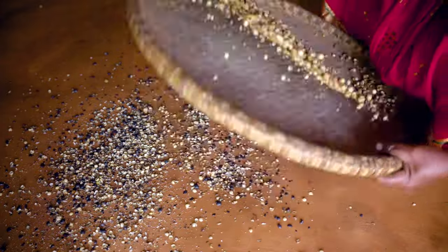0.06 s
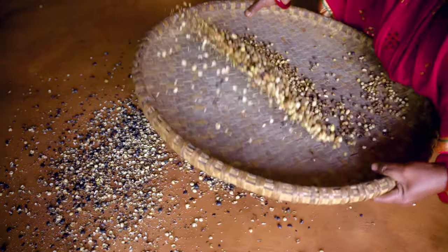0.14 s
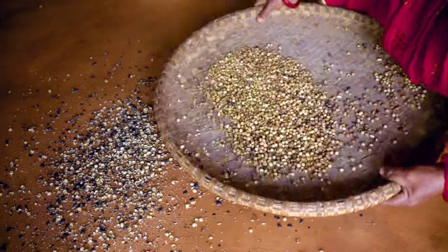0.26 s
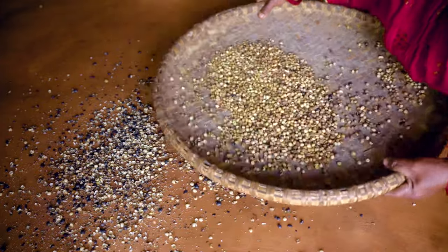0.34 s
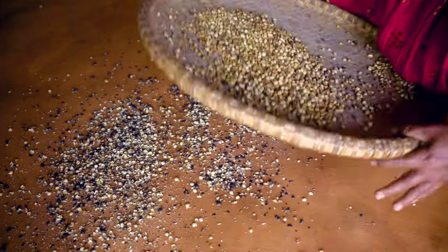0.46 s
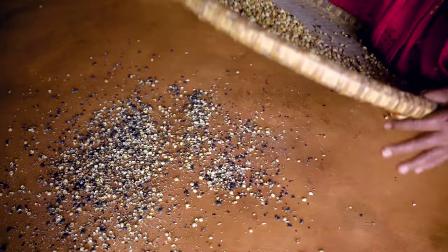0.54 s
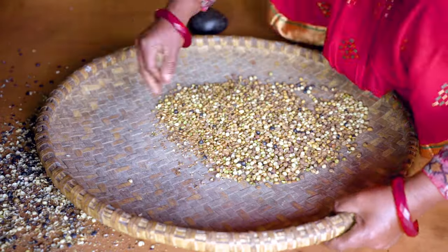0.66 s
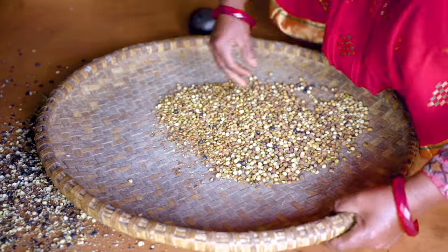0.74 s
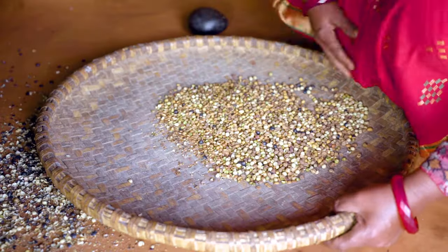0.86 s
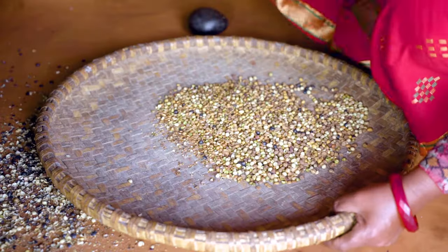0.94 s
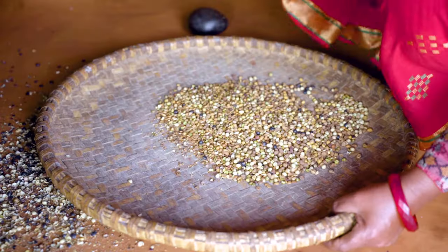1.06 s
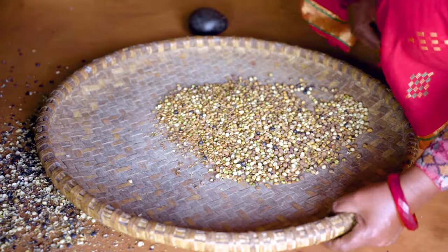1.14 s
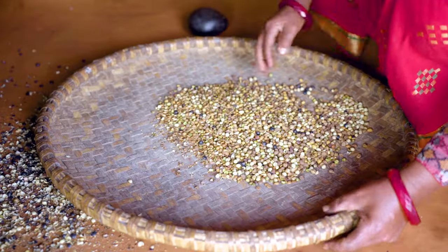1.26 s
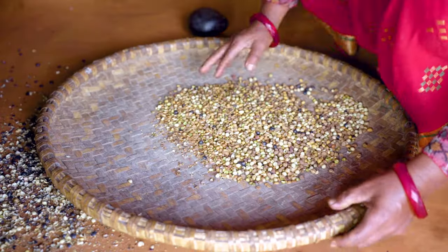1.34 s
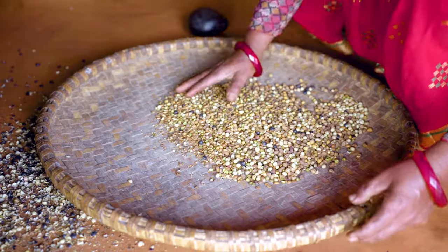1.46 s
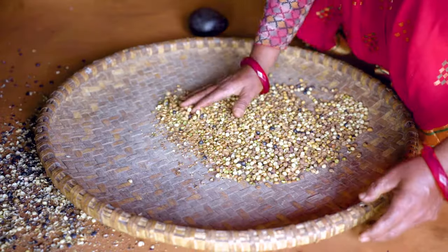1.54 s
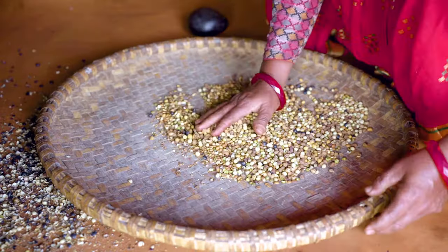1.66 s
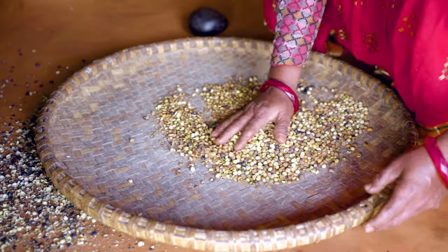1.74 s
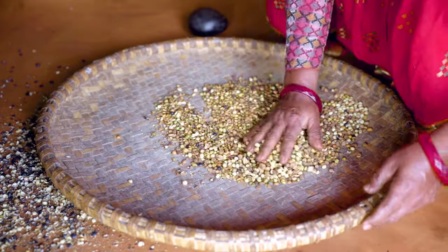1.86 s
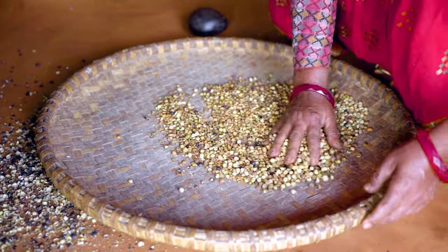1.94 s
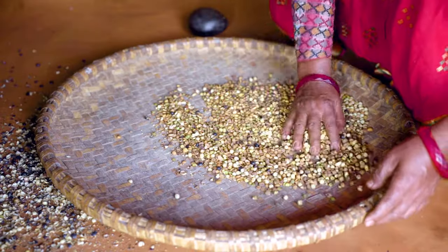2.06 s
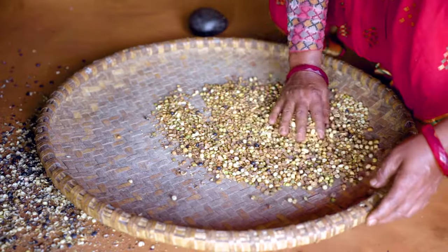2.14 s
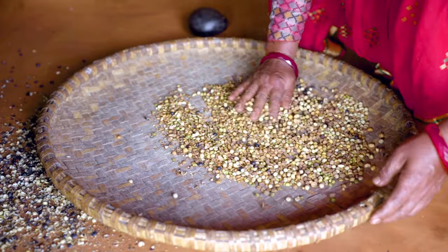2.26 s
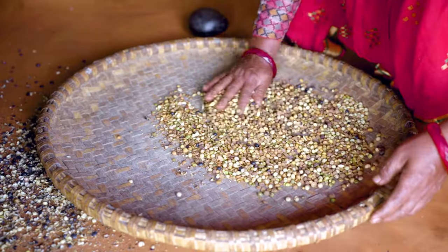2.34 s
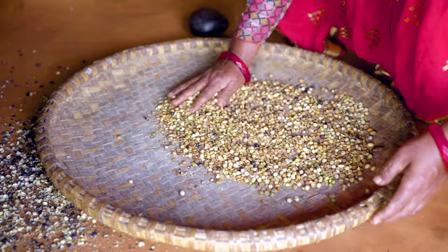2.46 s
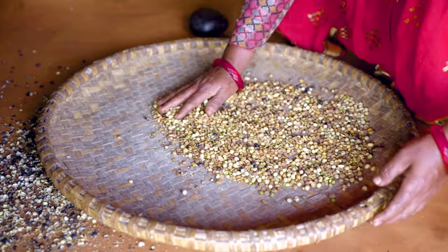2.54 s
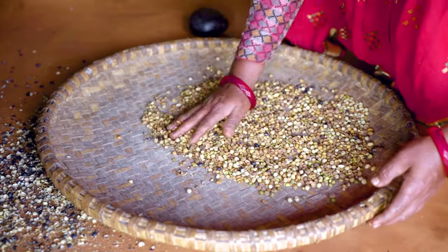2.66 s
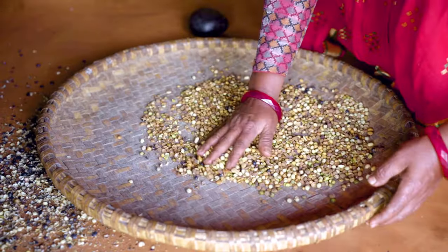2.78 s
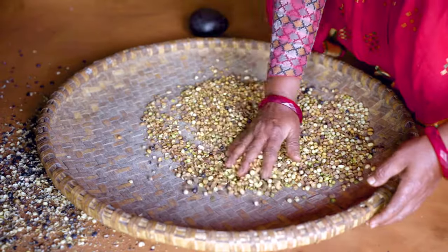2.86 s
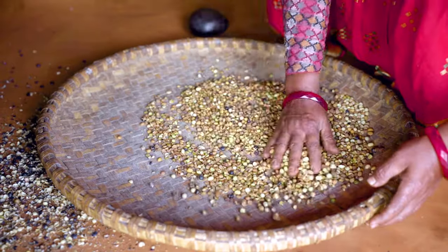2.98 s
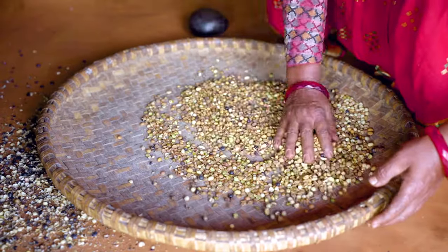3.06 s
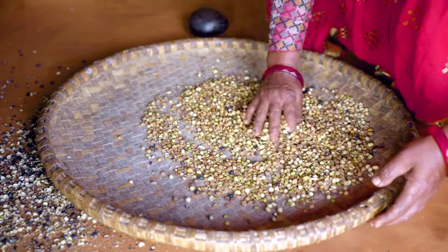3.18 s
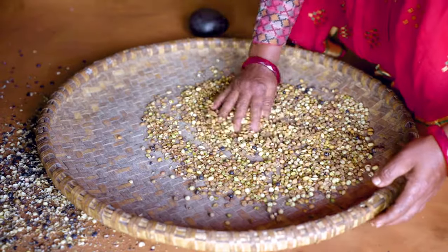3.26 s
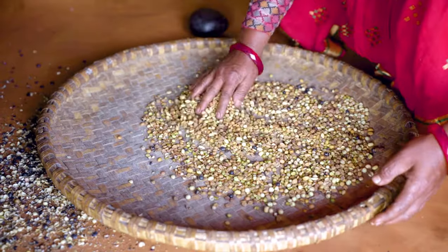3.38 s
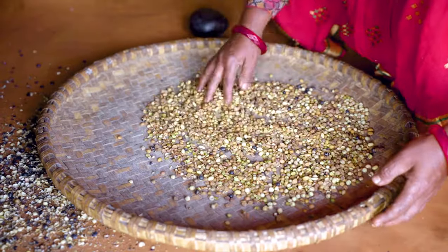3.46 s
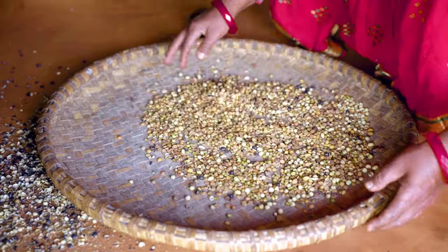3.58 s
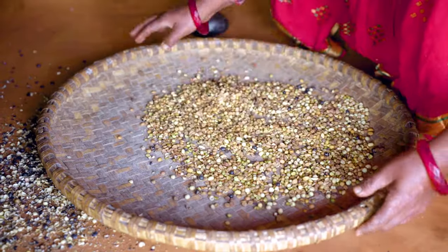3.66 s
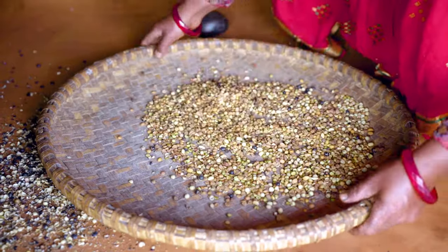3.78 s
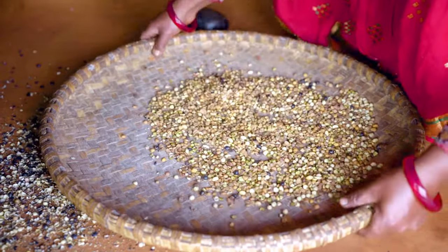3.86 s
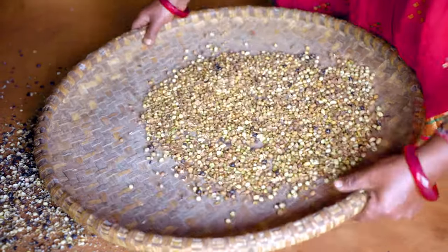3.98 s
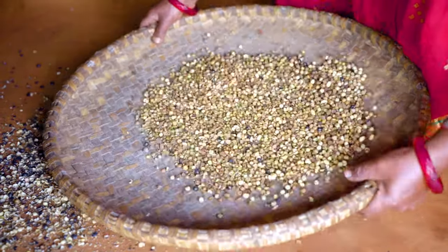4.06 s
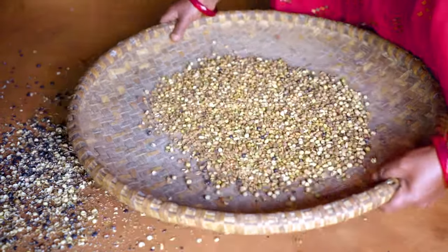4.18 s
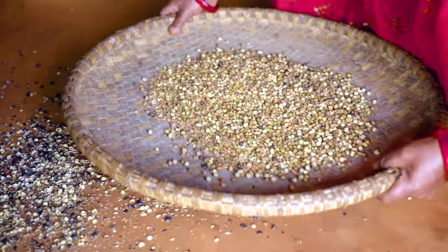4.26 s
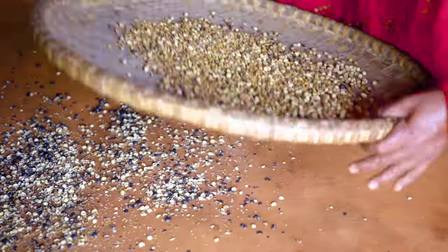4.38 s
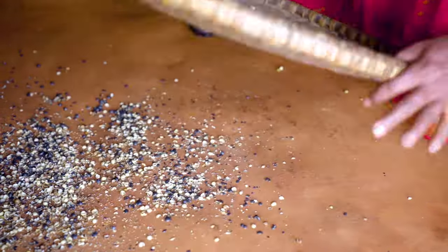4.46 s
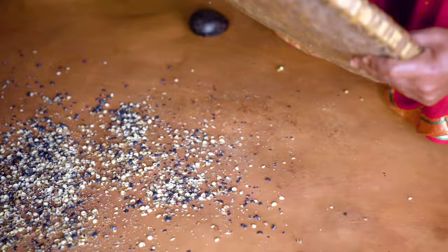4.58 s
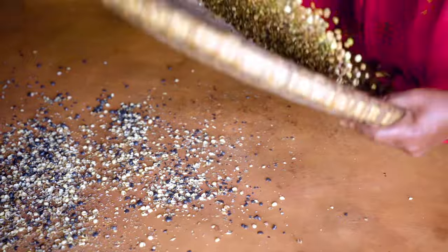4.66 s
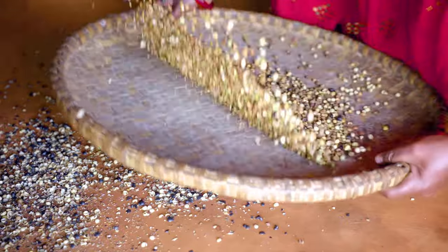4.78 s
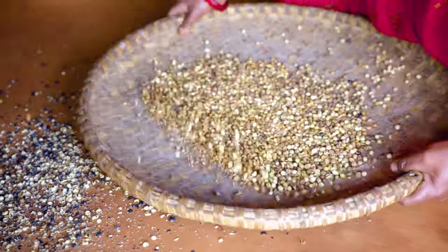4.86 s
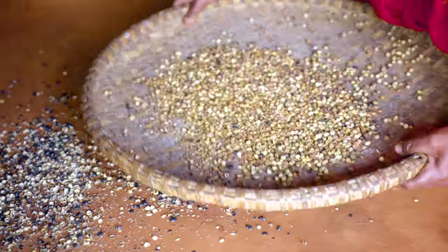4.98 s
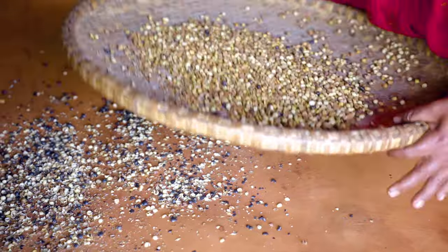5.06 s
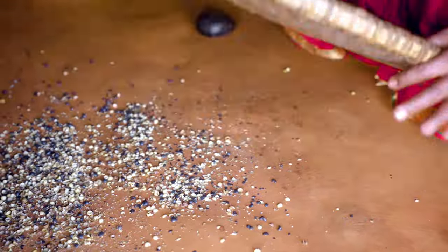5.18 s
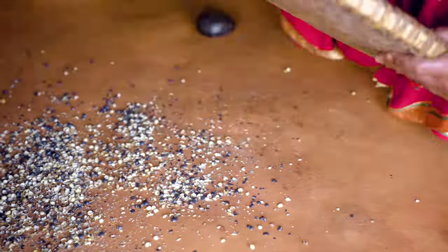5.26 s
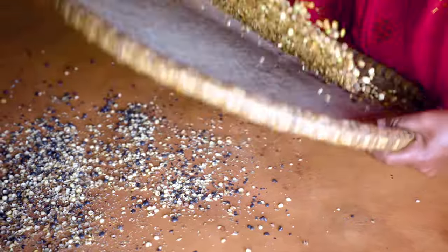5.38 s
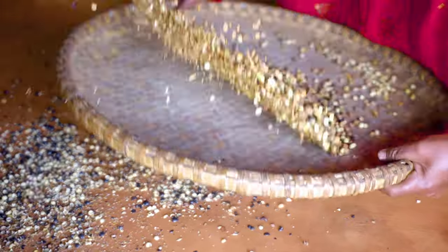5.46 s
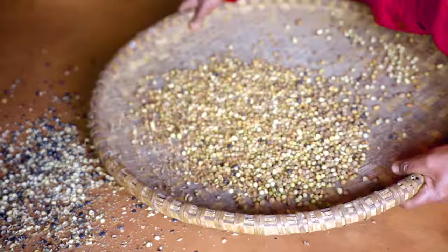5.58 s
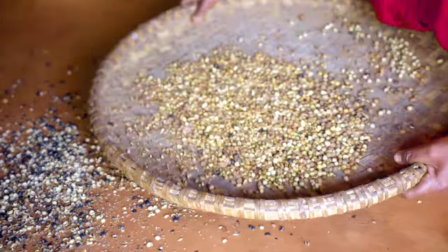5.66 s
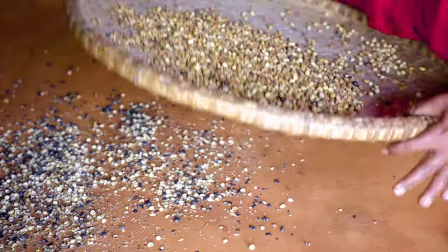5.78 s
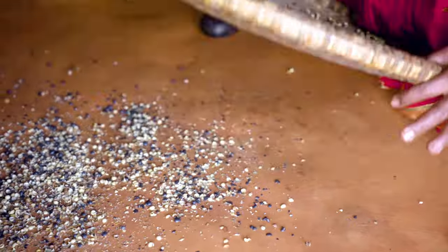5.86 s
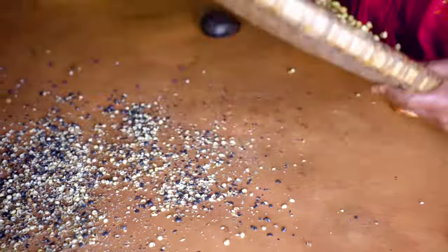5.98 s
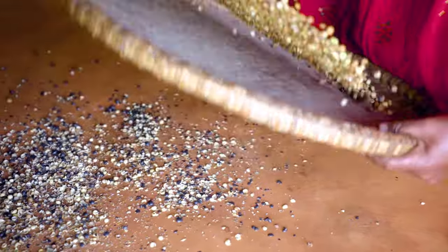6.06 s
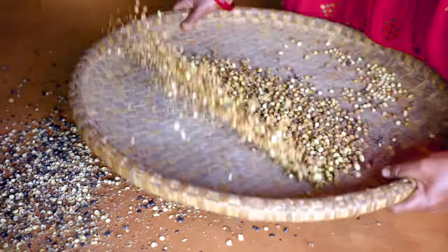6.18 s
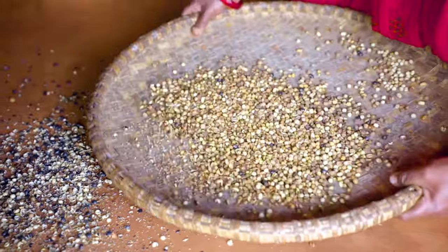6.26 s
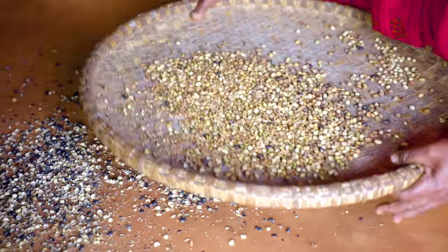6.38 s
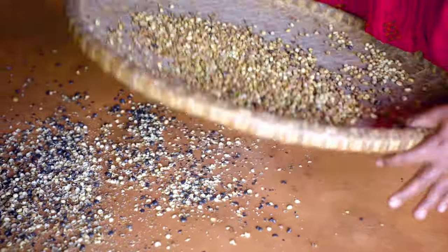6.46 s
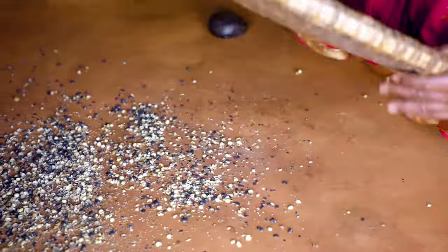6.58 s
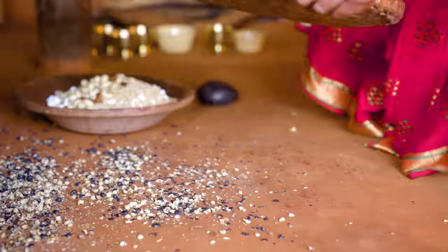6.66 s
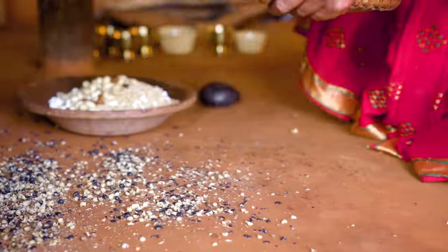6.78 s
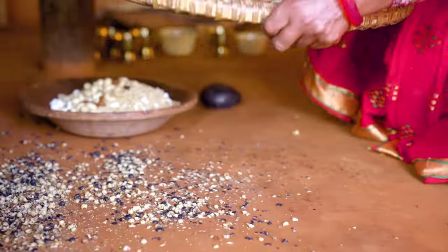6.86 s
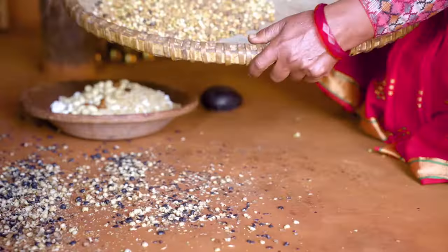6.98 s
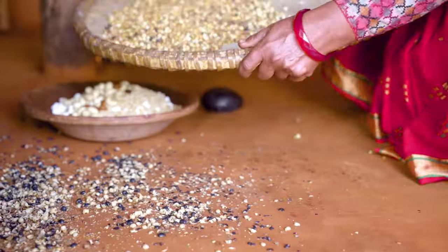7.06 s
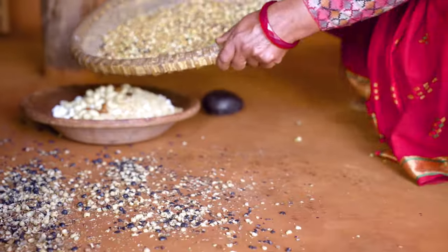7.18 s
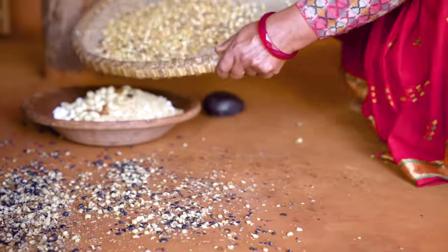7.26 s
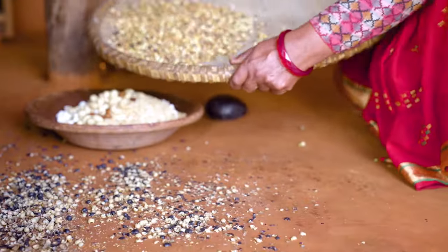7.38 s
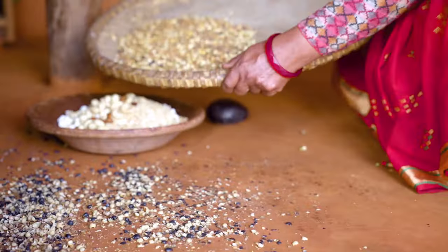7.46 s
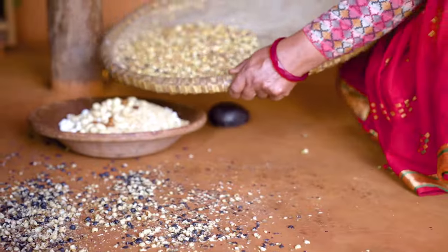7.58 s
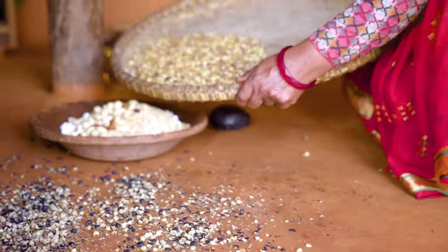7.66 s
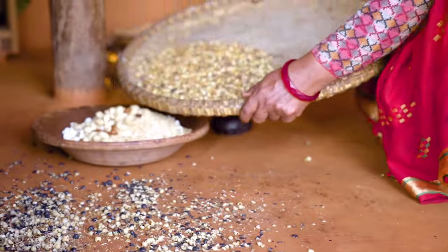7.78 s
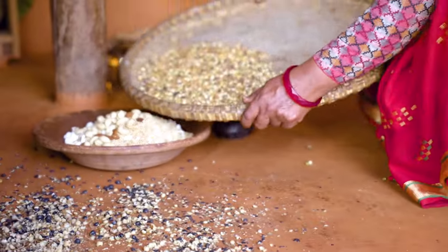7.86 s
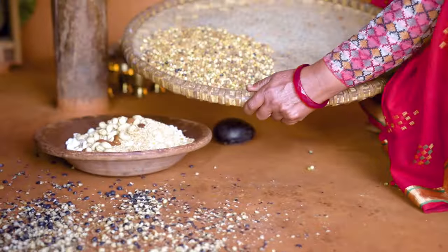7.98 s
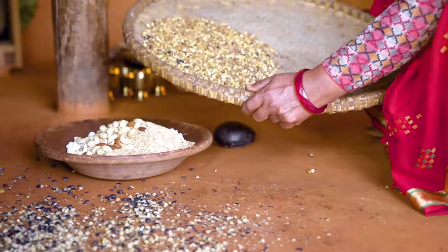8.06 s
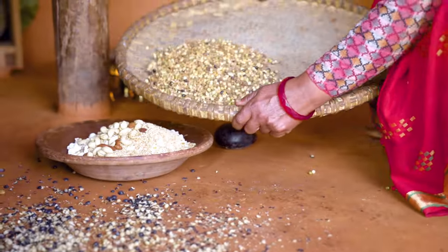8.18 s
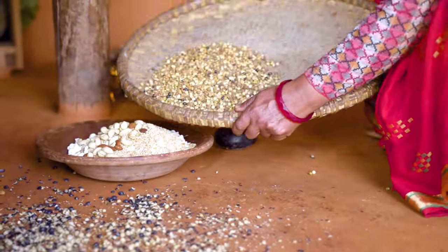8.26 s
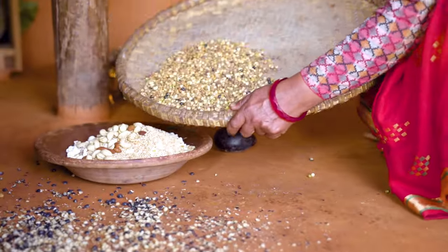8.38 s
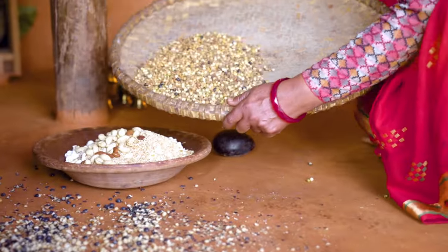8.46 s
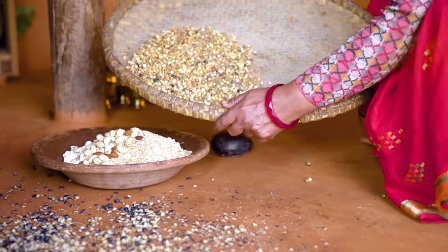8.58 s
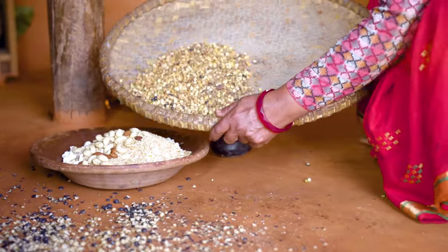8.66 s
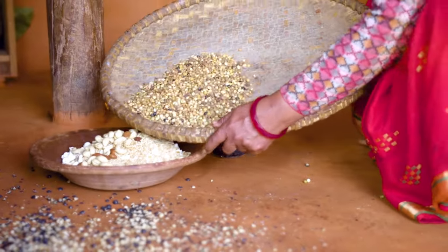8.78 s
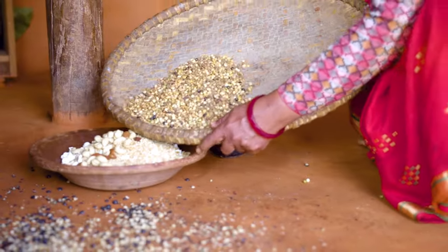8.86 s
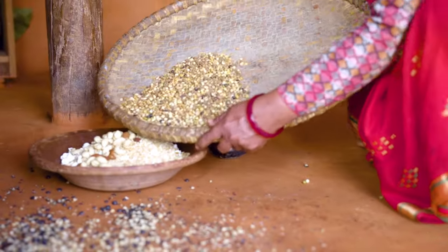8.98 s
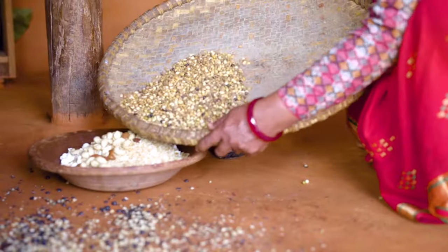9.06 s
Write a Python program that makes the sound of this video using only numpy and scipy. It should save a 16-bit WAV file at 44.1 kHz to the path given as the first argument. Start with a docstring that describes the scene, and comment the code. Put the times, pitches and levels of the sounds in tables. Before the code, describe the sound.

A woven bamboo tray double-thumps and a heap of dried beans crashes onto it, quickly dying to a few rolling grains. After a near-silent pause, a hand stirs the heap in grainy circles. A shake swishes, three more tosses thump and pour down in rhythm, then gentler sifting shakes slide and roll the grains. Close, dry microphone in a small quiet room.

```python
"""A double thump of a woven bamboo tray opens the scene, then tossed beans and grains crash down and roll out.
They are winnowed close by over an earthen floor. Later a hand stirs the heap, the tray is tossed again,
and it is shaken to and fro. Thumps are ringing modes of the tray with noise from its loose weave.
Moving grains are random clicks that ring bamboo strips, plus short bean-on-bean ticks,
with level, treble and bass that change as they move. Still air, a deep rumble and a sleeve lie behind."""
import sys
import numpy as np
from scipy import signal
from scipy.fft import rfft, irfft, next_fast_len
from scipy.io import wavfile

SR = 44100
rng = np.random.default_rng(int(sys.argv[2]) if len(sys.argv) > 2 else 0)


def transcribe(u):
    """Save the signal u as a 16-bit wav file named by the first command-line argument.

    u: samples, shape (n,) or (channels, n), limited to [-1, 1]; the rate is SR.
    q: integer samples, one column per channel.
    """
    v = np.clip(np.atleast_2d(u).T, -1, 1)
    q = np.round(v * 32767).astype(np.int16)
    wavfile.write(sys.argv[1], SR, q)


N = 402191
TIME = np.arange(N) / SR
TAPS = 4096  # filter length in samples


def amp(db):
    """Turn dB into a plain multiplier."""
    return 10 ** (np.asarray(db) / 20)


def evened(x):
    """Scale a sound to an rms of 1."""
    return x / np.sqrt(np.mean(x ** 2) + 1e-20)


def read(points, hz):
    """A spectrum in dB, joined by straight lines over log frequency."""
    f, db = np.transpose(points)
    return np.interp(np.log(hz + 1), np.log(f + 1), db)


def add(mix, s, sound):
    """Lay a sound into the mix, starting at s seconds."""
    part = mix[max(round(s * SR), 0):][:len(sound)]
    part += sound[:len(part)]


def coloured(x, colour):
    """Causal filter with the given spectrum: clicks keep their sharp fronts."""
    hz = np.fft.rfftfreq(TAPS, 1 / SR)
    cepstrum = irfft(np.log(amp(read(colour, hz))))
    # folding the cepstrum makes the filter respond as early as it can
    cepstrum[1:TAPS // 2] *= 2
    cepstrum[TAPS // 2 + 1:] = 0
    response = irfft(np.exp(rfft(cepstrum)))
    return signal.oaconvolve(x, response)[:len(x)]


def noise(colour):
    """Steady noise of rms 1 with the given spectrum."""
    size = next_fast_len(N, True)
    gain = amp(read(colour, np.fft.rfftfreq(size, 1 / SR)))
    spectrum = rfft(rng.standard_normal(size)) * gain
    return evened(irfft(spectrum, size)[:N])


def bell(t, s, width_s):
    """A smooth bump of height 1 around a moment."""
    return np.exp(-((t - s) / width_s) ** 2)


def swell_db(t, s, rise_s, fall_s):
    """A rounded peak of 0 dB with exponential flanks."""
    distance = (t - s) / np.where(t < s, rise_s, fall_s)
    return 20 * np.log10(np.e) * (1 - np.hypot(1, distance * np.sqrt(2)))


# Colour of the still air. Each row: frequency in Hz, relative level in dB per Hz.
AIR_COLOUR = [(29, -38), (50, -14), (122, -6), (163, -16), (198, -3.5), (223, -8), (746, -15), (1050, -15),
              (4900, -22.5), (16000, -40)]
# The deep rumble swells now and then. Each row: peak time in seconds, level in dB, rise and fall in seconds.
RUMBLE_SWELLS = [(.49, -49, .06, .08), (.66, -39, .008, .04), (.78, -41.5, .08, .08), (3.24, -46, .03, .06),
                 (4.1, -54, .12, .12), (6.82, -48, .05, .06), (7.13, -49, .06, .07), (7.95, -46, .3, .15),
                 (8.6, -44, .17, .17)]
# Colour of the rumble. Each row: frequency in Hz, relative level in dB per Hz.
RUMBLE_COLOUR = [(8, -4.5), (18, 0), (35, -14), (60, -20), (120, -42), (400, -88)]
# A sleeve rustles. Each row: middle in seconds, level in dB, half length in seconds.
SLEEVE_RUSTLES = [(1.075, -54, .012), (1.157, -46.5, .024), (1.37, -55, .025), (1.52, -56, .03)]
# Colour of the sleeve. Each row: frequency in Hz, relative level in dB per Hz.
SLEEVE_COLOUR = [(290, -47), (500, -6), (1950, -3), (2390, -9), (2610, -6), (6800, -16), (16000, -31)]


def background():
    """Still air, a deep swelling rumble and the rustle of a sleeve are three coloured noises."""
    air_db, rumble_db = -55.2, -57.5  # the rumble's level is the one between swells
    air = amp(air_db) * noise(AIR_COLOUR)
    swell_power = sum(amp(db + swell_db(TIME, s, rise_s, fall_s)) ** 2
                      for s, db, rise_s, fall_s in RUMBLE_SWELLS)
    rumble = noise(RUMBLE_COLOUR) * np.sqrt(amp(rumble_db) ** 2 + swell_power)
    rustle = sum(amp(db) * bell(TIME, s, half_s) for s, db, half_s in SLEEVE_RUSTLES)
    return air + rumble + noise(SLEEVE_COLOUR) * rustle


# Ways the tray rings. Each row: pitch in Hz, level in dB before favouring, seconds to fade by 60 dB.
TRAY_MODES = [(98, -44, .25), (140.5, -33.5, 0.225), (195, -24.5, .16), (237, -25, .08), (291, -21, .16),
              (334, -21, 0.063), (298, -10.5, 0.017), (455, -14.5, .065), (533, -19, 0.052),
              (645, -20.5, .11), (760, -29, 0.094), (1146, -23, .08)]


def tray_ring(t, favoured_hz=290, favour_db=6.5):
    """The modes of the tray after a unit blow; the spot that is struck favours those near one pitch."""
    hz, db, t60 = np.transpose(TRAY_MODES)[:, :, None]
    octaves_away = np.log2(hz / favoured_hz)
    db = db + favour_db * np.exp(-(octaves_away / 0.23) ** 2)
    return np.sum(amp(db - 60 * t / t60) * np.cos(2 * np.pi * hz * t), axis=0)


# Colour of the weave as it shudders. Each row: frequency in Hz, relative level in dB per Hz.
SHUDDER_COLOUR = [(40, -19), (120, -10), (300, 0), (520, 3), (850, -4), (1600, -4.5), (2500, -15),
                  (5000, -22), (9000, -29), (16000, -40)]


def blow(push_s, shudder_db, shudder_t60, crack, favoured_hz=290):
    """A short push rings the tray; its loose weave cracks and shudders."""
    t = TIME[:2 * TAPS]
    push = t * np.exp(-t / push_s)
    body = signal.oaconvolve(tray_ring(t, favoured_hz), push / push.sum())[:len(t)]
    # an open tray radiates little deep bass
    body = coloured(body, [(30, -20), (95, -10), (190, 0)])
    weave = evened(coloured(rng.standard_normal(len(t)), SHUDDER_COLOUR))
    fading = amp(-60 * t / shudder_t60) + crack * np.exp(-t / .0016)
    return body + amp(shudder_db) * weave * fading


# The tray is jolted, then its floor snaps back. Each row: jolt in seconds, its strength in dB before a trim,
# the Hz it favours, snap in seconds, its strength in dB before a trim, the Hz it favours,
# time scale of the snap's push in seconds, length of the whole thump in seconds.
THUMPS = [(0.0253, 1.8, 204, .0342, 2.8, 450, 0.00029, .16),
          (4.625, -.5, 240, 4.6316, -1.5, 320, 0.00016, .16),
          (5.3042, .5, 195, 5.313, -3.2, 540, 0.00013, .16),
          (5.9966, -1, 254, 6.0041, -3.2, 540, 0.00013, .16),
          (6.6771, -4, 267, 6.6837, -3.5, 337, 0.00018, .05)]


def thump(jolt_s, jolt_db, jolt_hz, snap_s, snap_db, snap_hz, push_s, length_s):
    """A soft jolt and, a few milliseconds later, the sharper snap of the tray's floor."""
    x = amp(jolt_db + 3.2) * blow(
        push_s=.0003, shudder_db=-30, shudder_t60=0.15, crack=4.2, favoured_hz=jolt_hz)
    sharp_db = -20 * np.log10(push_s / 0.00017)  # a slower push shakes the weave less
    snap = blow(push_s, shudder_db=sharp_db - 20.5, shudder_t60=0.17, crack=2.6, favoured_hz=snap_hz)
    add(x, snap_s - jolt_s, amp(snap_db + 1.5) * snap)
    # a near wall sends the low body of the thump back and prolongs it
    wall = coloured(x, [(400, -1), (1500, -9), (5000, -22)])
    add(x, .0205, amp(-14.5) * wall)
    return jolt_s, x * np.clip((length_s - TIME[:len(x)]) / .003, 0, 1)


def contact(ring_s, ring, size=700):
    """One grain strikes: a click, then the brief ring of the strip of bamboo under it. Energy 1."""
    tail = rng.standard_normal(size) * np.exp(-np.arange(size) / SR / ring_s)
    hit = ring * tail / np.linalg.norm(tail)
    hit[0] += rng.choice([-1, 1])
    return hit / np.linalg.norm(hit)


def tick(hz, ring_s, size=300):
    """Two beans knock together: a few cycles at the given pitch. Energy 1."""
    t = TIME[:size]
    x = np.cos(2 * np.pi * hz * t) * np.exp(-t / ring_s)
    return x / np.linalg.norm(x)


def impacts(per_s, spread_db):
    """Random kicks of uneven size at a changing rate; rarer kicks are larger, and the rms is 1."""
    luck, weight, side = rng.random((3, N))[:, :len(per_s)]
    chance = np.clip(per_s / SR, 1e-4, 1)
    size = amp(spread_db * np.minimum(-np.log(1 - weight), 3.2))
    return evened(size * np.sign(side - .5) * (luck < chance) / np.sqrt(chance))


def patter(level_db, per_s, crowding, ticks_db, count=24):
    """Livelier grains hit bamboo strips more often; as they calm, bright bean-on-bean ticks stand out."""
    n = len(level_db)
    lively_db = np.clip(level_db - level_db.mean(), -9, 12)
    strip = rng.integers(0, count, N)[:n]
    hits = impacts(per_s * amp(crowding * lively_db), spread_db=4.0)
    # a few large beans keep bouncing, 60 a second, and are masked while the heap is lively
    bounces = impacts(np.full(n, 60), spread_db=3.0)
    hits = hits + amp(-11.5 - .5 * lively_db) * bounces
    weave = evened(sum(signal.oaconvolve(hits * (strip == k), contact(ring_s=.0012, ring=1.2))[:n]
                       for k in range(count)))
    clicks = impacts(520 * amp(.7 * lively_db), spread_db=4.0) * amp(ticks_db - 0.19 * lively_db)
    ticks = 0
    for k, hz in enumerate(np.geomspace(2200, 14500, count)):
        knocks = signal.oaconvolve(clicks * (strip == k), tick(hz, ring_s=.00035))[:n]
        ticks = ticks + knocks * np.sqrt(hz / 7000)
    return weave + ticks


def together(parts):
    """Groups of grains (level dB, treble dB, bass dB) add in power; each brings its treble and bass."""
    power = [amp(2 * np.maximum(level, -120)) for level, _, _ in parts]
    total = sum(power)
    treble, bass = (sum(p * amp(2 * part[k]) for p, part in zip(power, parts)) / total for k in (1, 2))
    return 10 * np.log10([total, treble, bass])


def clumps(t, level_db, every_s, uneven_db):
    """Grains move in small random clumps, which stand out most when few are moving."""
    at = np.arange(t[0], t[-1] + every_s, every_s)
    thin = np.clip((level_db.max() - level_db) / 15, .5, 1.5)
    return uneven_db * thin * np.interp(t, at, rng.standard_normal(TAPS)[:len(at)])


def band_db(x, band):
    """Rms level of x in dB within a band."""
    hz = np.fft.rfftfreq(len(x), 1 / SR)
    inside = (hz > band[0]) & (hz < band[1])
    power = 2 * np.sum(abs(rfft(x)[inside]) ** 2) / len(x) ** 2
    return 10 * np.log10(power + 1e-20)


# Three bands for comparing levels. Each: lowest and highest frequency in Hz.
MIDDLE = (700, 3000)
TREBLE = (6000, 15500)
BASS = (180, 600)


def grains(t, parts, colour, per_s, crowding, ticks_db, drumming, trim_db):
    """Groups of moving grains: fast contacts are brighter, and falling ones drum on the tray."""
    level_db, treble_db, bass_db = together(parts)
    x = patter(level_db, per_s, crowding, ticks_db)
    ring = tray_ring(TIME[:2 * TAPS], favour_db=1.5)
    drum = signal.oaconvolve(x, ring / abs(rfft(ring)).max())[:len(x)]
    x = coloured(x + drumming * drum, colour)
    x = x / amp(band_db(x, MIDDLE))
    hz, at, z = signal.stft(x, SR, nperseg=256)
    hard_db = np.interp(t[0] + at, t, treble_db) - band_db(x, TREBLE)
    drum_db = np.interp(t[0] + at, t, bass_db) - band_db(x, BASS)
    # hardness tilts everything above the middle; drumming shifts the low end
    treble = read([(1500, 0), (4000, 0.56), (7000, 0.91), (15000, 1.2)], hz)[:, None]
    bass = read([(400, 1), (900, 0.014)], hz)[:, None]
    z = z * amp(treble * hard_db + bass * drum_db)
    x = signal.istft(z, SR, nperseg=256)[1][:len(t)]
    fade = np.clip((t[-1] - t) / .015, 0, 1)
    uneven_db = clumps(t, level_db, every_s=.012, uneven_db=.8)
    return t[0], x * amp(level_db + trim_db + uneven_db) * fade


# Colour of landing grains and hard beans. Each row: frequency in Hz, starting relative level in dB per Hz.
LANDING_COLOUR = [(90, -39), (165, -24.5), (255, -11.5), (500, -4), (640, 0), (850, -.8), (1400, 0.9),
                  (1950, 0.5), (2500, -3.5), (4700, -5.5), (6300, -13), (8100, -11), (12300, -19.5),
                  (16000, -27)]
# The tossed heap lands. Each row: start in seconds, level in dB before a small trim, seconds until it stops,
# level of the roll-out in dB before the same trim, how fast the roll-out fades in dB per second.
LANDINGS = [(.107, -14.2, .535, -42.5, 12), (4.738, -14, .56, -25, 31), (5.438, -13.9, .55, -31.5, 36),
            (6.126, -14.2, .535, -29.5, 63)]


def landing(s, db, length_s, roll_db, roll_db_per_s):
    """The heap pours down on the tray, dies away quickly, and leaves a few grains rolling."""
    attack_s, hold_s, sag_db_per_s, fall_db_per_s = .006, .238, 7, 140
    roll_out_s = .33  # the rolling is loudest here
    t = np.arange(-attack_s, length_s + .01, 1 / SR)
    attack_db = 20 * np.log10(np.clip(1 + t / attack_s, 1e-3, 1))
    fall_db = fall_db_per_s * .02 * np.logaddexp(0, (t - hold_s) / .02)  # a softened corner
    pour_db = db + attack_db - sag_db_per_s * t - fall_db
    # the pouring heap hits hardest in mid-fall
    pour_treble_db = -16.5 + 10 * bell(t, .187, width_s=.155)
    # the gathered heap briefly damps the tray
    pour_bass_db = -11 - 6 * bell(t, .3, width_s=.07)
    rolling_db = roll_db + attack_db - roll_db_per_s * abs(t - roll_out_s)
    # rolling grains are dull and drum on the weave
    parts = [(pour_db, pour_treble_db, pour_bass_db), (rolling_db, -17.8, -8.5)]
    return grains(s + t, parts, LANDING_COLOUR, per_s=5000, crowding=.65, ticks_db=-7,
                  drumming=.6, trim_db=.3)


# Single beans strike the weave hard.
# Each row: start in seconds, peak in dB before a fixed cut, treble against the middle in dB.
BEANS = [(.502, -22, -6), (.573, -27, -15), (.627, -28, -10), (1.617, -9, -14), (1.786, -14, -18),
         (3.681, -20, -20), (3.701, -26, -18), (1.315, -36, -22), (3.731, -27, -22), (3.845, -25, -18),
         (3.865, -31, -20), (4.005, -15, -15), (4.355, -14, -20), (4.494, -17, -14), (4.719, -10.5, -19),
         (4.729, -10, -16), (5.089, -9, -5), (5.412, -11.5, -20), (5.427, -8, -21), (6.107, -10, -12),
         (6.1285, -2, -19), (6.879, -20, -24), (7.061, -12.5, -26), (7.868, -17, -12), (7.899, -18, -13)]


def bean(s, peak_db, treble_db):
    """One large bean hits the weave and chatters for a few milliseconds."""
    x = coloured(contact(ring_s=0.0032, ring=3.0, size=1400), LANDING_COLOUR)
    hard_db = treble_db - band_db(x, TREBLE) + band_db(x, MIDDLE)
    x = coloured(x, [(2000, 0), (8000, hard_db)])
    return s, amp(peak_db - 4.5) * x / abs(x).max()


# Fingers and heap bump the tray lightly, and a low bump sounds at 0.644 s. Each row: start in seconds, strength
# of the blow in dB.
KNOCKS = [(.644, -30), (1.07, -45), (1.315, -41), (1.607, -22), (3.845, -35), (4.028, -20), (6.879, -23),
          (7.061, -19)]


def knock(s, db):
    """A light bump is a slower push with a short shudder of the weave."""
    bump = blow(push_s=0.00043, shudder_db=-20, shudder_t60=.06, crack=2.5, favoured_hz=195)
    return s, amp(db) * bump


# The scrape rises and falls as the fingers plough deep or shallow. Each row: time in seconds, centre in Hz.
SCRAPE = [(1.58, 1780), (1.74, 1500), (1.92, 1940), (2.15, 1680), (2.24, 2080), (2.6, 1480), (3.31, 2020),
          (3.35, 1680), (3.6, 1880)]


def ploughed(s, x, lift_db, octaves):
    """The hand shifts a broad resonance of the heap up and down."""
    hz, at, z = signal.stft(x, SR, nperseg=512)
    centre = np.interp(s + at, *np.transpose(SCRAPE))
    hump = np.exp(-(np.log2((hz[:, None] + 1) / centre) / octaves) ** 2)
    moving = hump - hump.mean(1, keepdims=True)  # keeps the average colour
    return s, signal.istft(z * amp(lift_db * moving), SR, nperseg=512)[1][:len(x)]


def circling(t, mean, swing, top_s):
    """A quantity that swings once with every circle of the hand, 0.98 s long."""
    return mean + swing * np.cos(2 * np.pi * (t - top_s) / .98)


# Colour of stirred grains. Each row: frequency in Hz, starting relative level in dB per Hz.
STIRRING_COLOUR = [(90, -42), (150, -23.5), (260, -18.5), (440, -17.5), (720, -8.5), (1100, -3),
                   (1850, 0.5), (3000, -5.5), (4600, -11), (6400, -19.5), (8100, -16.5), (9800, -22.5),
                   (12300, -23), (16000, -33)]
# Pressure, treble and bass swing once a circle. Each: mean in dB, swing in dB, time of a maximum in seconds.
STIR_PRESSURE = (0, 1.3, 2.12)
STIR_TREBLE = (-12.3, 1.5, 2.38)
STIR_BASS = (-21.6, 3.6, 2.6)
# The fingers shove a clump of grains. Each row: peak in seconds, level in dB before a small trim,
# half length in seconds, treble in dB, bass in dB.
SHOVES = [(1.628, -23.2, .04, -10, -16.5), (2.119, -17, .009, -19, -28), (2.477, -23.5, .022, -16, -21),
          (2.755, -23, .07, -17, -24), (2.995, -22, .04, -18, -23)]


def stirring():
    """The hand dips into the heap, circles twice and lifts out; the grains settle."""
    start_s, end_s, attack_s, fall_db_per_s = 1.546, 3.55, .065, 108
    t = np.arange(start_s, end_s + .32, 1 / SR)
    attack_db = 20 * np.log10(np.clip((t - start_s) / attack_s, 1e-3, 1))
    # the hand presses less at the start and the end
    arch_db = -1.6 * np.interp(t, [start_s, end_s], [-1, 1]) ** 2
    fall_db = fall_db_per_s * np.maximum(t - end_s, 0)
    level_db = -23 + attack_db + arch_db + circling(t, *STIR_PRESSURE) - fall_db
    parts = [(level_db, circling(t, *STIR_TREBLE), circling(t, *STIR_BASS))]
    for s, db, half_s, treble_db, bass_db in SHOVES:
        parts.append((db + swell_db(t, s, half_s, half_s), treble_db, bass_db))
    stirred = grains(t, parts, STIRRING_COLOUR, per_s=5500, crowding=.7, ticks_db=-9.5,
                     drumming=.4, trim_db=-0.2)
    return ploughed(*stirred, lift_db=6.8, octaves=.8)


def shaken(shakes, roll_db_per_s, roll_treble_db, roll_bass_db):
    """Each shake is a swish of sliding grains and a slowly fading roll; returns times and groups."""
    stop_s = .025  # the roll dies this fast when the tray stops
    t = np.arange(shakes[0][0] - 3 * shakes[0][2], shakes[-1][0] + shakes[-1][-1] + stop_s, 1 / SR)
    parts = []
    for s, db, rise_s, fall_s, treble_db, bass_db, roll_db, roll_s in shakes:
        swish_db = swell_db(t, s, rise_s, fall_s)
        # a swish is hardest at its peak and dulls as it falls
        hard_db = 1.4 + .3 * np.maximum(swish_db, -20)
        parts.append((db + swish_db, treble_db + hard_db, bass_db))
        edges_db = swell_db(t, np.clip(t, s, s + roll_s - stop_s), rise_s, stop_s)
        rolling_db = roll_db + edges_db - roll_db_per_s * np.maximum(t - s, 0)
        parts.append((rolling_db, roll_treble_db, roll_bass_db))
    return t, parts


# Colour of shaken grains. Each row: frequency in Hz, starting relative level in dB per Hz.
SHAKING_COLOUR = [(100, -30), (170, -19.5), (260, -11), (430, -5.5), (700, -2.5), (1300, -1), (2000, -4),
                  (2700, -9), (4200, -11), (6200, -22), (8100, -19.5), (9500, -24.5), (12500, -25),
                  (16000, -34)]
# Each shake slides the heap, which then rolls on. Each row: peak in seconds, level in dB before a small trim,
# rise and fall in seconds, treble in dB before the swish hardens it, bass in dB,
# starting level of the roll in dB before the same trim, seconds that it rolls.
SHAKES = [(4.016, -31.4, 0.088, 0.012, -15.9, -15.2, -43.3, 0.1),
          (4.077, -23.5, 0.049, 0.035, -15.4, -6.8, -36.3, 0.1),
          (4.186, -12.8, 0.042, 0.041, -15.3, -14.2, -25.7, 0.41)]
# How the grains roll after a shake: fading in dB per second, treble in dB, bass in dB.
SHAKE_ROLL = (17, -21.5, -10)


def shaking():
    """Shakes of the tray slide the heap with a swish and leave it rolling."""
    return grains(*shaken(SHAKES, *SHAKE_ROLL), SHAKING_COLOUR, per_s=6000, crowding=.55,
                  ticks_db=-5.5, drumming=.7, trim_db=0.3)


# Colour of sifted grains. Each row: frequency in Hz, starting relative level in dB per Hz.
SIFTING_COLOUR = [(100, -31), (170, -18.5), (260, -4), (400, -6), (700, -1.5), (1400, 0), (2500, -5.5),
                  (3500, -7.5), (4800, -9.5), (6300, -18), (8000, -15.5), (9800, -22), (12500, -24),
                  (16000, -35)]
# Gentler shakes with the tray held out over a bowl. Each row: peak in seconds, level in dB,
# rise and fall in seconds, treble in dB before the swish hardens it, bass in dB,
# starting level of the roll in dB, seconds that it rolls.
SIFTS = [(6.885, -45.0, 0.117, 0.053, -17.9, -3.8, -46.3, 0.16),
         (6.956, -34.8, 0.027, 0.028, -16.7, -10.6, -37.3, 0.16),
         (7.124, -25.0, 0.053, 0.109, -19.6, -9.2, -35.8, 0.2),
         (7.374, -20.8, 0.067, 0.07, -15.1, -10.7, -32.8, 0.19),
         (7.513, -22.5, 0.047, 0.067, -9.8, -12.3, -22.7, 0.69),
         (8.247, -21.1, 0.052, 0.057, -9.2, -12.8, -25.7, 0.34),
         (8.734, -23.9, 0.078, 0.064, -10.8, -12.2, -26.0, 0.38)]
# How the grains roll after a gentler shake: fading in dB per second, treble in dB, bass in dB.
SIFT_ROLL = (28, -15.8, -9.8)


def sifting():
    """Gentler shakes slide the grains with less drumming on the tray."""
    return grains(*shaken(SIFTS, *SIFT_ROLL), SIFTING_COLOUR, per_s=6000, crowding=.55,
                  ticks_db=-6.5, drumming=0.25, trim_db=0)


def room(x, wet_db, t60):
    """A faint, short echo from the floor and walls: sparse random reflections that fade."""
    t = TIME[:3 * TAPS]
    sparse = (rng.random(len(t)) < .05) * (t > .004)
    tail = rng.standard_normal(len(t)) * sparse * amp(-60 * t / t60)
    return x + amp(wet_db) * signal.oaconvolve(x, tail / np.linalg.norm(tail))[:N]


def scene():
    """Tossing, stirring and shaking on one tray, in a small quiet room."""
    mix = np.zeros(N)
    for row in THUMPS:
        add(mix, *thump(*row))
    for row in LANDINGS:
        add(mix, *landing(*row))
    for row in BEANS:
        add(mix, *bean(*row))
    for row in KNOCKS:
        add(mix, *knock(*row))
    add(mix, *stirring())
    add(mix, *shaking())
    add(mix, *sifting())
    return (room(mix, wet_db=-14.5, t60=.19) + background())[None]


def record(dry):
    """The loudest peaks are rounded off; then the highest treble is cut."""
    ceiling, edge_hz = .9, 15950
    rounded = dry / (1 + (dry / ceiling) ** 6) ** (1 / 6)
    low_pass = signal.firwin(511, edge_hz, window=("kaiser", 9), fs=SR)
    return signal.oaconvolve(rounded, low_pass[None], "same")


dry = scene()
out = record(dry)
transcribe(out)
```